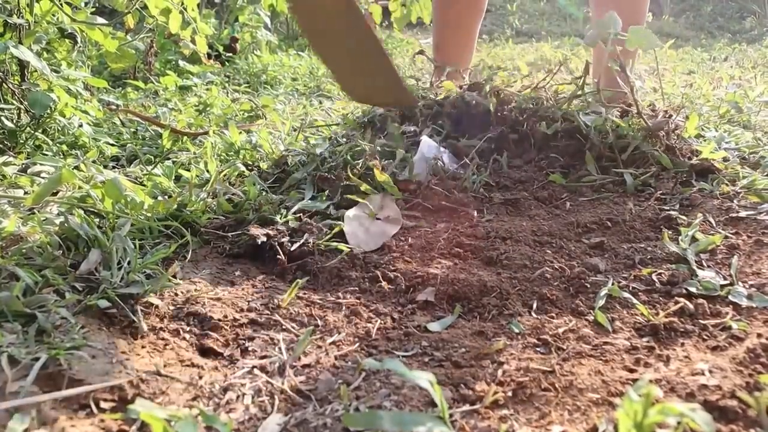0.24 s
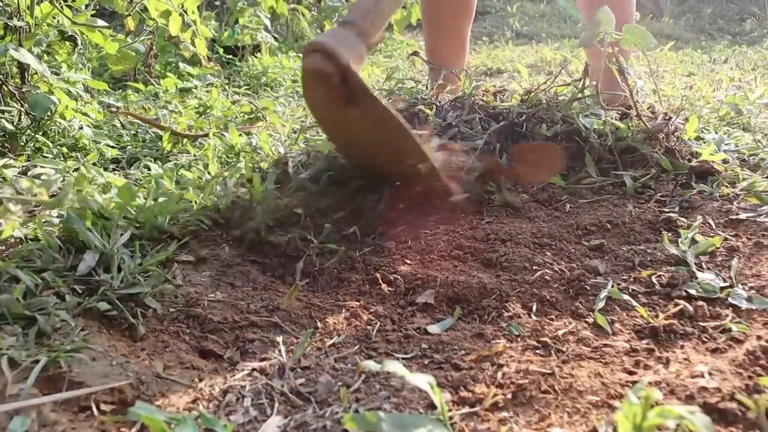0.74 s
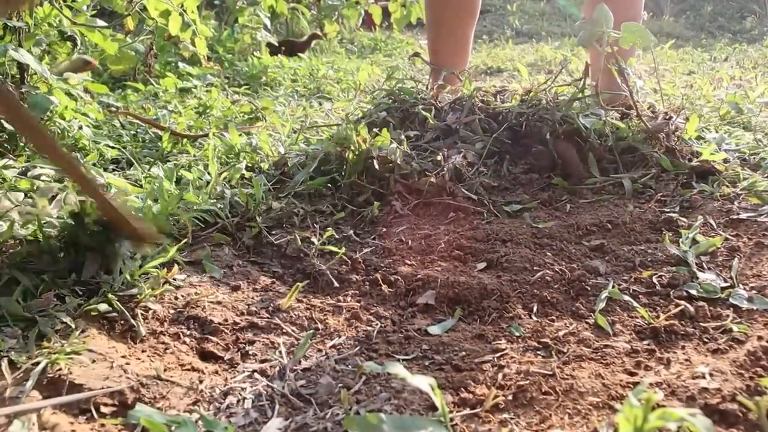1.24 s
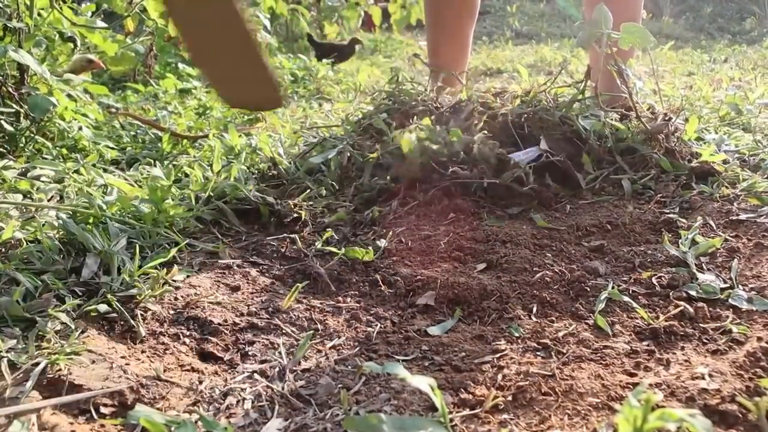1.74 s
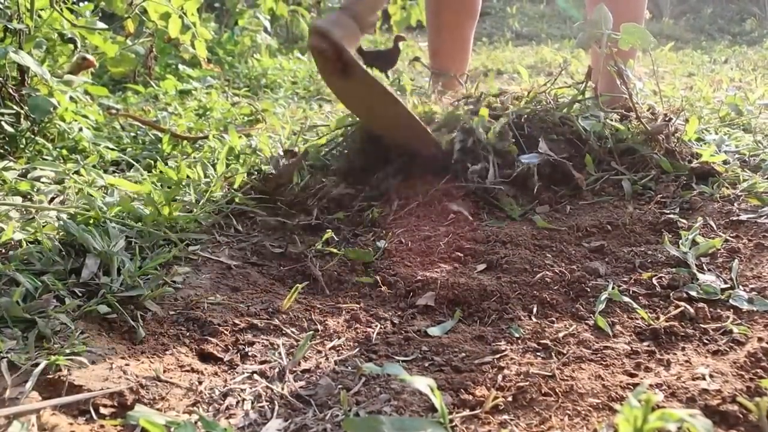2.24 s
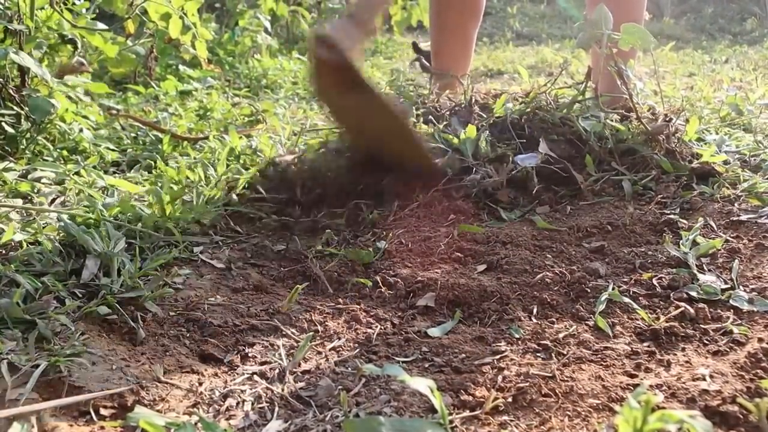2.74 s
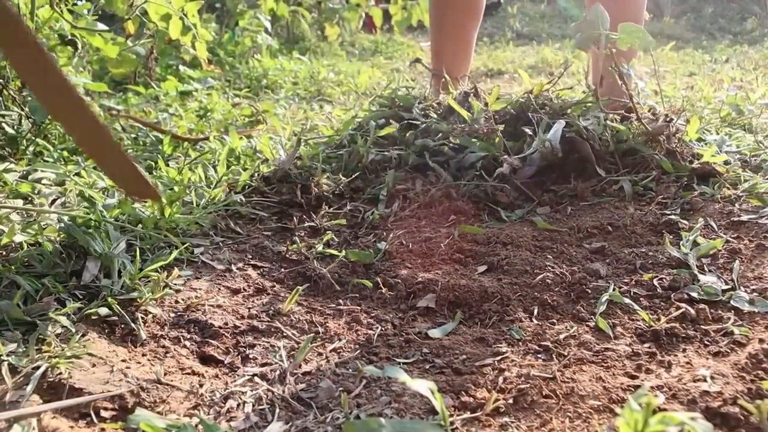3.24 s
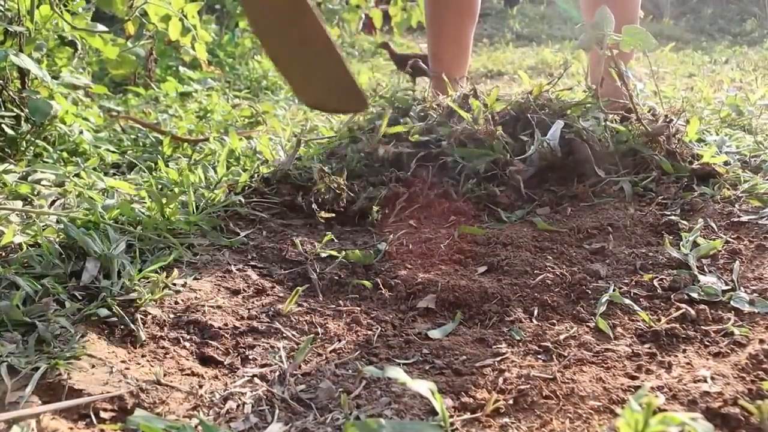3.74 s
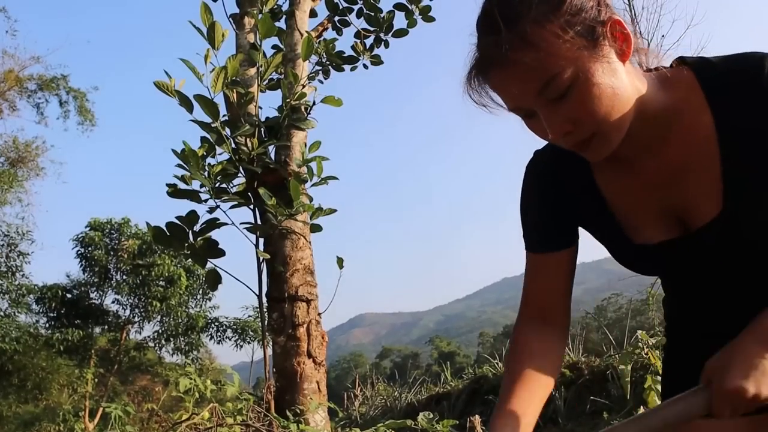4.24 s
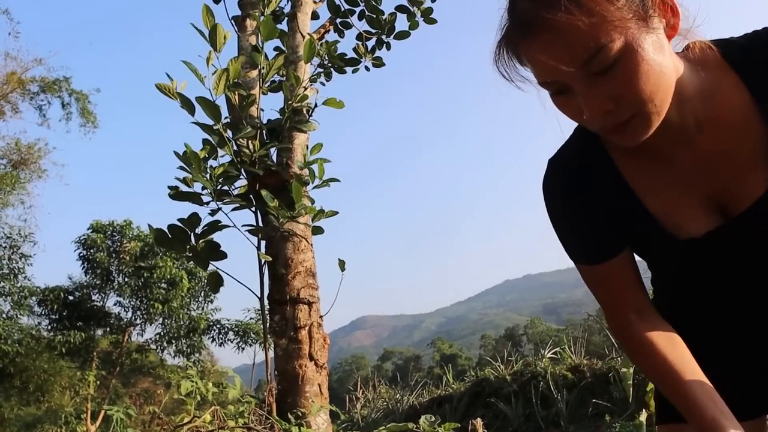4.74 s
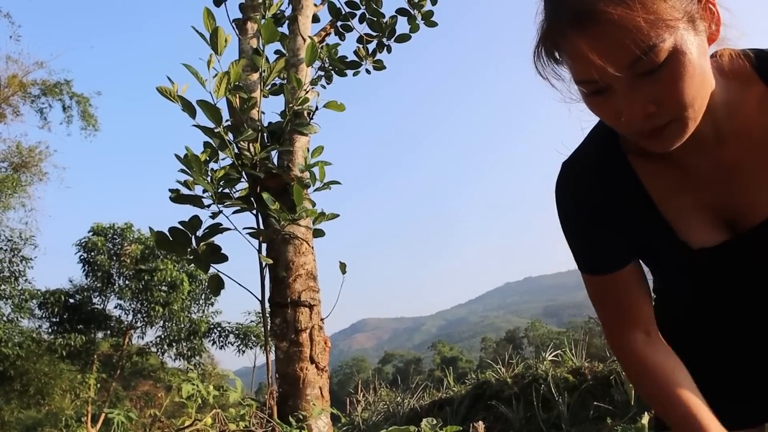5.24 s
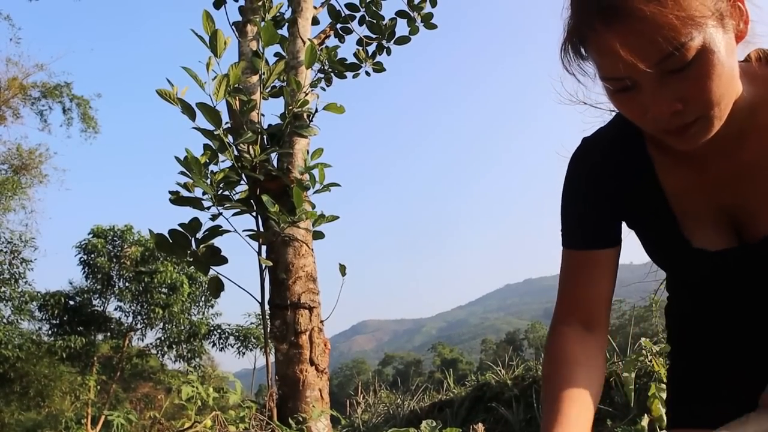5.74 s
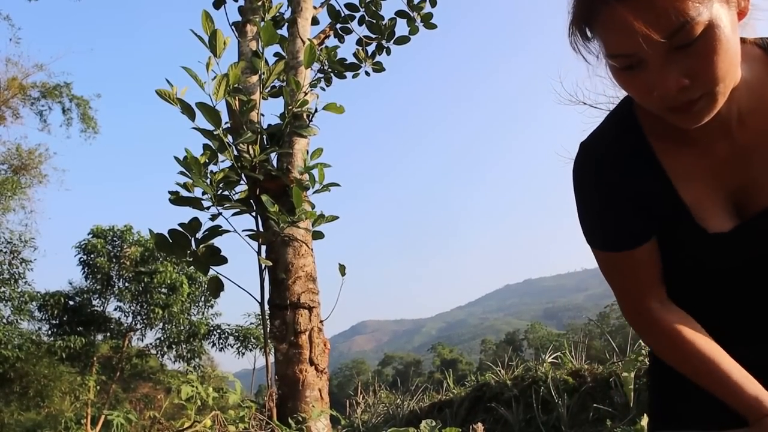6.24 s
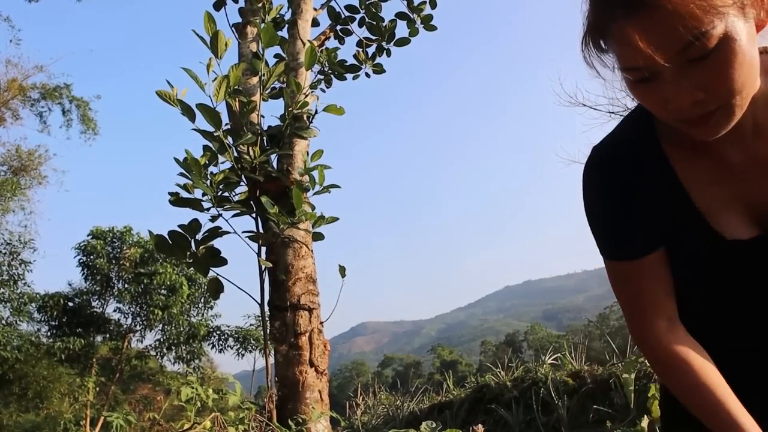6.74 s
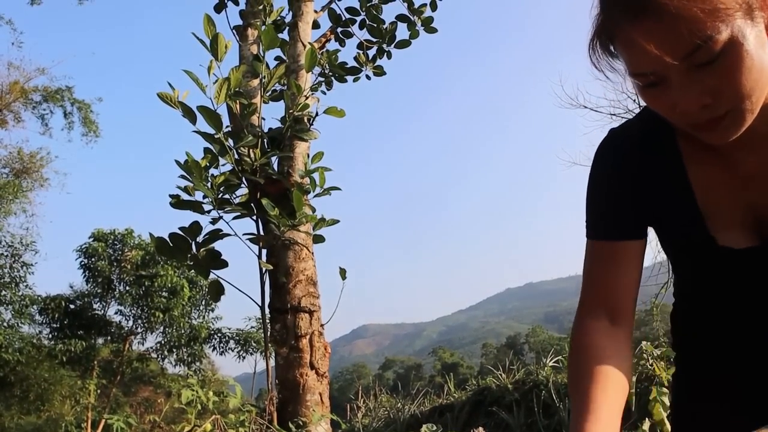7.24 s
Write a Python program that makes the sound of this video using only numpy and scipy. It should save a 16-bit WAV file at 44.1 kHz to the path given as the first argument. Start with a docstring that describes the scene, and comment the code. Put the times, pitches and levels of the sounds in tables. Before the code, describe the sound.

Ten hoe strokes in steady rhythm, miked close outdoors in stereo. First a soft gritty thud, then louder sharp chops with packed-earth knocks, scraping stones, brief metallic clinks and falling clods. Between them, high chick peeps glide downward and a low far engine hums. Around the middle the sound cuts for an instant; four more gritty chops follow from another position, with weed rustling, crumbs, two soft footstep-like thumps and faint insect hiss.

```python
"""First comes a soft, gritty thud: a steel hoe chops dry, grassy soil, ten strokes in all.
Strokes swish, bite and drag as bursts of random cracks coloured by the soil; clods knock and trickle.
Stones scrape the blade, so its resonances clink; chicks peep nearby as gliding near-sines.
Coloured noise makes the faint garden air, with a far engine at first and far insects later.
It is heard from the ground, then from a little aside, with a tiny silence in between."""
import sys
import numpy as np
from scipy import signal
from scipy.fft import rfft, irfft
from scipy.io import wavfile

SR = 44100
rng = np.random.default_rng(int(sys.argv[2]) if len(sys.argv) > 2 else 0)


def put_to_file(sound):
    """Save the sound as 16-bit audio at rate SR, in the file named by the first command-line argument."""
    columns = np.atleast_2d(sound).T  # one column per channel
    safe = np.clip(columns, -1, 1)
    whole_steps = np.round(safe * 32767)
    wavfile.write(sys.argv[1], SR, whole_steps.astype(np.int16))


N = 330750
TIME = np.arange(N) / SR
MOVE_S = 3.92  # the listening place changes here
FIRST_PLACE = TIME < MOVE_S

# strokes of the hoe: bite at t/s, crunch level/dB, bite rise/s, bite length/s, thud/dB re crunch,
#   grit/dB re crunch, time in the weeds before the bite/s, swish level/dB, delay of the drag/s,
#   drag level/dB, trickle level/dB before the lift of each kind of debris
STROKES = [(0.0, -36.5, 0.0015, 0.017, 5, 1, 0.0095, -38, 0.057, -39.5, -44.5),
           (0.707, -14.5, 0.0046, 0.013, -4.5, -2.5, 0.059, -27.5, 0.085, -31, -47.5),
           (1.4017, -8.5, 0.0017, 0.0043, -11.5, -7, 0.096, -28.5, 0.11, -37, -48),
           (2.0968, -13, 0.0021, 0.011, -4.5, -2, 0.065, -32, 0.081, -30.5, -48.5),
           (2.7827, -4.5, 0.001, 0.0027, -15, -6.5, 0.11, -37.5, 0.109, -42.5, -47),
           (3.464, -13, 0.00095, 0.019, -3, -3.5, 0.11, -37, 0.041, -25, -50),
           (4.56, -17, 0.0002, 0.0025, -2, 9.5, 0.0022, -34, .085, -40, -56),
           (5.293, -20, 0.0024, 0.028, -17, -4.5, 0.025, -24.5, 0.1, -35, -51.5),
           (6.0307, -13, 0.00031, 0.0043, -6.5, 2, 0.0069, -28.5, 0.087, -36, -52),
           (6.7844, -12.5, 0.00079, 0.0044, -11.5, 1, 0.0097, -26.5, 0.13, -40, -55)]
# clods breaking or landing, two footstep-like thumps (near 5.7 s), and a faint rustle as the sound
#   returns after the silence: t/s, crunch level/dB, length/s, thud/dB re crunch, grit/dB re crunch
CLODS_AND_THUMPS = [(0.022, -36.5, 0.019, -13, 0), (0.1036, -25, 0.0049, -3.5, -1.5),
                    (0.653, -31.5, 0.015, -22, -28), (0.722, -20, 0.0066, -2, 0.5),
                    (0.737, -26, 0.00202, -14.5, -2), (0.746, -25.5, 0.012, -10, -6),
                    (0.765, -25, 0.0066, -17, -4), (0.828, -24.5, 0.0096, -3.5, -4),
                    (0.844, -39, 0.016, -5, 0), (1.371, -37, 0.0063, -12, 7), (1.435, -30, 0.016, -8, -10),
                    (1.501, -30, 0.016, -8, -2.5), (1.898, -52, 0.0052, 5.5, 9),
                    (2.115, -25.5, 0.0064, 4.5, 1.5), (2.166, -24.5, 0.0043, 0.5, -13),
                    (2.18, -22, 0.0049, -8, -3), (2.219, -32.5, 0.0066, -8, -3),
                    (2.866, -37, 0.0037, -2, -8), (3.456, -26, 0.0049, -18, -12),
                    (3.559, -30.5, 0.03, -7.5, 0), (3.5847, -25, 0.0055, -5, -1),
                    (3.889, -53, 0.0008, -12, 15), (3.922, -46.5, 0.045, -4, -1.5),
                    (4.5697, -18.5, 0.0037, -5, 5), (4.574, -27, 0.0008, -1, 8),
                    (4.636, -47, 0.025, -12, -4), (4.645, -37.5, 0.0059, -15, 4.5),
                    (4.928, -42.5, 0.0091, -2, -7), (5.2705, -20, 0.0024, -21, 0),
                    (5.312, -25, 0.0048, -13, 6), (5.342, -28, 0.01, -18, -6),
                    (5.391, -15.5, 0.0059, -16.5, -9.5), (5.662, -43, 0.0092, 8.5, 5),
                    (5.78, -44.5, 0.0079, 9, -13), (6.035, -20, 0.0051, -7.5, 4),
                    (6.105, -38.5, 0.0044, -15.5, 8), (6.128, -29.5, 0.0065, -13, -9),
                    (6.776, -22, 0.0042, -11, -1), (6.921, -33, 0.0083, -10, -14)]
# stones scraping the blade: t/s, ring level/dB, scrape/s, factor on the blade's own ring times,
#   highest excited f/Hz, crunch level/dB, thud/dB re crunch
STONES = [(.217, -47, 0.0028, 4.5, 4770, -40, -14), (.258, -40.5, 0.012, 1.6, 3500, -43, -1),
          (0.7745, -22, 0.0015, 0.41, 4900, -18, 0), (.801, -33, .002, 0.66, 8000, -44, -18),
          (1.4519, -13, 0.0042, 0.79, 12000, -16, -8.5), (2.147, -36, .003, .7, 7000, -29, -8),
          (2.798, -13.5, 0.0046, 0.16, 7000, -32, -43), (2.831, -16.5, 0.0077, 0.38, 9000, -25, -36),
          (2.839, -13, 0.0029, 0.34, 5400, -36, -30), (3.0318, -29.5, 0.00056, 2.14, 4240, -34, -3),
          (3.492, -20.5, 0.0081, 0.61, 6860, -27, -12), (3.526, -15.5, 0.0027, 0.41, 3360, -29, 1.5),
          (4.561, -20.5, 0.0039, 0.76, 4500, -26, -18)]
# hollow knocks of the blade on packed earth: t/s, f/Hz, level/dB, decay/s
KNOCKS = [(0.708, 569, -9, 0.0071), (0.7745, 417, -12, 0.0045), (1.4017, 756, -2, 0.0019),
          (1.4545, 1110, -7, .003), (2.0965, 520, -5.5, 0.0027), (2.783, 980, -6, 0.0006),
          (3.467, 525, -9.5, 0.0049), (3.471, 790, -9, 0.0042), (5.295, 473, -13.5, 0.0044)]
# resonances of the blade: f/Hz, level/dB re the ring, basic time to fade by 60 dB/s
BLADE_MODES = [(550, -9, 0.13), (1407, -10, 0.11), (2043, -3, 0.03), (2973, -2, 0.13), (3110, -4.5, 0.07),
               (3510, -12.5, .045), (4110, -1.5, 0.08), (4370, -10, 0.079), (4530, -6, 0.044),
               (5370, 0.5, 0.11), (5530, -2, 0.081), (6800, -4, .06), (7060, -8, 0.055), (9990, -9, 0.07)]
# the blade rakes through loose weeds: t/s, length/s, level/dB before the lift of each kind of debris
RAKES = [(3.94, 0.34, -57.5), (5.447, 0.33, -57), (6.163, 0.24, -58)]
# colour of the soil at the first and at the second listening place: f/Hz, relative level/dB per Hz
SOIL_FIRST = [(21, -33), (35, -17.5), (135, -1), (338, -9.5), (563, -3.5), (760, -5), (961, -9), (1120, -5),
              (1270, -7.5), (2530, -9.5), (2730, -10), (3020, -10), (5570, -11), (7370, -13), (8590, -11.5),
              (15400, -33)]
SOIL_SECOND = [(21, -53), (35, -3), (188, 6), (298, -2), (447, 7), (1120, 5), (1440, 0.5), (1910, -1),
               (2280, -8), (2800, -6.5), (4320, -18.5), (6660, -13), (7960, -12.5), (11100, -32),
               (15400, -50)]
# peeps of the chicks: t/s, glide length/s, start f/Hz, end f/Hz,
#   sag of the glide (1 steep at first, -1 steep at last), drop at the voice break/octaves,
#   level/dB before the shared lift
PEEPS = [(0.361, 0.035, 4600, 3366, -0.3, 0.012, -41.5), (0.528, 0.044, 4670, 3000, 0.82, 0, -40),
         (0.582, 0.059, 3850, 2370, 0.14, 0, -39.5), (1.1, 0.082, 4020, 2660, -0.95, 0.05, -43),
         (1.208, 0.046, 4720, 2970, 0.77, 0, -38), (1.572, 0.071, 4060, 2720, 1, 0.056, -37.5),
         (1.743, 0.026, 3940, 3450, -0.47, 0, -45), (1.765, 0.061, 4780, 2580, 0.11, 0, -36),
         (2.311, 0.057, 3620, 2630, 0.25, 0.052, -37), (2.383, 0.058, 4100, 2100, -0.48, 0.18, -43.5),
         (2.457, 0.055, 4290, 2680, -0.27, 0, -38.5), (2.542, 0.072, 4090, 2210, -1.1, 0.24, -40.5),
         (2.66, 0.06, 5560, 2680, 0.98, 0.063, -38.5), (3.147, 0.036, 4400, 2700, 0.36, 0.2, -47),
         (3.274, 0.072, 5070, 2400, 0.6, 0.18, -40.5), (3.4, 0.055, 3310, 2880, -0.99, 0, -43.5),
         (3.627, 0.041, 3070, 2030, -0.59, 0, -37.5), (3.785, 0.068, 3920, 2200, -1.45, 0.27, -42),
         (3.856, 0.0056, 1910, 1450, -0.044, 0, -33.5), (3.898, 0.0072, 4750, 4120, -0.61, 0.017, -36.5),
         (4.165, .048, 3390, 2610, 0.53, 0.0072, -44), (4.331, 0.045, 4200, 2540, 0.49, 0, -47),
         (4.491, 0.058, 5640, 3150, 1, 0, -48.5), (5.088, 0.063, 4130, 2790, 0.82, 0.015, -48.5),
         (5.522, 0.035, 4070, 2960, 0.43, 0.027, -44.5), (6.65, 0.049, 3990, 2360, 0.74, 0.12, -40.5)]
# stereo picture: f/Hz, side level/dB re mid at the first place, the same at the second,
#   leftward lean (-1 to 1) at the first place, the same at the second
STEREO = [(60, -28, -26, 0.45, 0), (200, -16.5, -29, .7, .06), (400, -15, -26, 0.78, .2),
          (700, -5.5, -9.5, 1, 0.5), (1230, -5.5, -3, 0.48, 0.56), (2410, -5, 3.5, 0.44, -0.058),
          (4600, 3.5, 5, 0.71, -0.26), (8100, 0.5, 5.5, -0.1, -0.17), (15000, 6, 8, 0.45, -0.33)]
# a far engine that slows down: t/s, f/Hz before a slight waver, level/dB before a slight wander
ENGINE = [(0, 210.8, -57.5), (2.4, 207.2, -51), (3.3, 161.6, -61.5), (3.9, 144.4, -56)]
# colours of the far rumble and the crumbs: f/Hz, relative level/dB per Hz
RUMBLE_COLOUR = [(15, -29), (25, -10), (118, -5.5), (151, -0.5), (263, -8), (400, -5.5), (520, -33),
                 (880, -120)]
CRUMB_COLOUR = [(150, -46.5), (250, -4.5), (507, -3.5), (655, -4), (807, -7.5), (2540, -13), (3030, -9),
                (4000, -30), (5200, -38), (8800, -120)]
# colour of the grass at the first and at the second place: f/Hz, relative level/dB per Hz
GRASS_FIRST = [(1940, -24), (3300, 4), (3780, -1), (4240, 0.5), (8750, 1.5), (11800, -2.5), (15400, -19)]
GRASS_SECOND = [(1940, -28), (3300, 4), (5020, -0.5), (6930, 3.5), (7990, 2.5), (9640, -4.5), (12400, -17),
                (15400, -25)]
# width of the outdoor air: f/Hz, side level/dB re mid
AIR_WIDTH = [(60, -17), (130, -16.5), (290, -3.5), (640, 0), (1400, 0.5), (3100, 6), (6800, 7), (15000, 3)]

# a swish through the weeds swells up to the bite; thud and grit are relative to its crunch
SWISH_RISE_S, SWISH_STOP_S, SWISH_THUD_DB, SWISH_GRIT_DB = 0.026, 0.0048, -6.5, 3.5
# pulled back, the blade shoves a wave of loose earth
DRAG_RISE_S, DRAG_FALL_S, DRAG_THUD_DB, DRAG_GRIT_DB = 0.026, 0.03, -12, -1
CLOD_RISE_S = 0.00036
STONE_RISE_S, STONE_LENGTH_S, STONE_GRIT_DB = 0.0015, 0.0085, 1
# crumbs and dry grass then trickle to rest
TRICKLE_PEAK_S, TRICKLE_DB_PER_S, RAKE_FADE_S = 0.045, 49.5, 0.12
# the garden at rest; the crumbs wander around their level
STILL_CRUMBS_DB, STILL_GRASS_DB, RUMBLE_DB = -55, -59.5, -54
# a peep hooks up to its starting pitch, and swells as it passes the resonance of the beak
HOOK_S, HOOK_OCTAVES, BEAK_HZ, BEAK_WIDTH_OCTAVES = 0.011, 0.16, 2840, 0.72
# falling through this pitch a voice may break: thin above it, fuller and lower below it
BREAK_HZ, BREAK_WIDTH_OCTAVES, THIN_VOICE_DB = 3500, 0.03, -3
# peeps fed to the leaf echo at the first and the second place
FIRST_ECHO_DB, SECOND_ECHO_DB = -10, -7
# right port leads at the second place: share of phase in the difference; decay of the scatter
LEAD_SHARE, SCATTER_S = 0.59, 0.00078
CUTOFF_HZ = 15600


def contacts():
    """List every soil burst or thump: t/s, level/dB, lead/s, rise/s, length/s, thud/dB, grit/dB."""
    for s, db, rise, length, thud, grit, weeds_s, swish_db, drag_s, drag_db, _ in STROKES:
        yield s, swish_db, weeds_s, SWISH_RISE_S, SWISH_STOP_S, SWISH_THUD_DB, SWISH_GRIT_DB
        yield s, db, weeds_s, rise, length, thud, grit
        yield s + drag_s, drag_db, drag_s, DRAG_RISE_S, DRAG_FALL_S, DRAG_THUD_DB, DRAG_GRIT_DB
    for s, db, length, thud, grit in CLODS_AND_THUMPS:
        yield s, db, np.inf, CLOD_RISE_S, length, thud, grit
    for s, *_, db, thud in STONES:
        yield s, db, np.inf, STONE_RISE_S, STONE_LENGTH_S, thud, STONE_GRIT_DB


def grains(per_s, spread_db, size):
    """Breaking grains make random cracks of very uneven strength; their rms is 1."""
    strength = from_db(spread_db * np.minimum(rng.exponential(1, size), 4))
    sign = rng.choice([-1, 1], size)
    happens = rng.random(size) < per_s / SR
    cracks = strength * sign * happens
    return cracks / magnitude(cracks) * np.sqrt(size)


def hollow(share, decay_s, size=512):
    """Blade and furrow throw back early reflections that colour each contact differently."""
    echoes = rng.standard_normal(size) * np.exp(-np.arange(size) / (decay_s * SR))
    echoes[0] = 0
    return signal.unit_impulse(size) + share * echoes / magnitude(echoes)


def soil_blows(per_s, crumbs_per_s, spread_db, tail_db, tail_s, push_db, push_s, size=16384):
    """Each contact is a swell of breaking grains: the ground thuds, clods crunch, sand and stems hiss."""
    out = np.zeros(N)
    t = (np.arange(size) - size // 4) / SR
    after = np.maximum(t, 0)
    thud_crunch_grit_hz = [(25, 350), (350, 3500), (3500, 18000)]
    places = []
    for colour in (SOIL_FIRST, SOIL_SECOND):
        soil = response(colour)
        places.append([band(soil, low, high, order=3) for low, high in thud_crunch_grit_hz])
    # the ground is pressed down and springs back once
    push = (after / push_s) * (1 - after / push_s / 2) * np.exp(-after / push_s)
    for s, db, lead, rise, length, thud, grit in contacts():
        # pressure builds and the soil gives way in dense cracks; then sparse crumbs run on
        bite = np.exp(np.minimum(t, 0) / abs(rise) - (after / length) ** 2) * (t > -abs(lead))
        tail_height = from_db(tail_db) * np.sqrt(abs(length) / tail_s)
        tail = tail_height * np.exp(-after / tail_s) * (t > 0)
        cracks = bite * grains(per_s, spread_db, size) + tail * grains(crumbs_per_s, spread_db, size)
        cracks = signal.fftconvolve(cracks, hollow(share=0.45, decay_s=0.0011))
        target = magnitude(np.hypot(bite, tail))
        for body, rel_db in zip(places[int(s > MOVE_S)], (thud, 0, grit)):
            burst = signal.fftconvolve(cracks, body)[:size]
            add(out, s + t[0], from_db(db + rel_db) * burst * target / magnitude(burst))
        add(out, s, from_db(db + thud + push_db) * push[size // 4:])
    return out


def knocks(rise_s):
    """Packed earth answers the blade with a few quickly damped cycles."""
    out = np.zeros(N)
    t = np.arange(SR // 10) / SR
    for s, hz, db, decay in KNOCKS:
        envelope = (1 - np.exp(-t / rise_s)) * np.exp(-t / decay)
        add(out, s, from_db(db) * envelope * np.sin(2 * np.pi * hz * t))
    return out


def resonate(x, hz, t60):
    """One resonance stores motion and lets it die away; its gain is about 1 at its peak."""
    r = from_db(-60 / (t60 * SR))
    feed = np.array([1, 0, -1]) * (1 - r * r) / 2
    feedback = [1, -2 * r * np.cos(2 * np.pi * hz / SR), r * r]
    return signal.lfilter(feed, feedback, x + 1e-18)


def buried_blade(soil, ring_db, damping, dull_hz, grip_db):
    """Soil noise drives the damped blade, mostly its lowest mode; strong noise is limited, as if gripped."""
    grip = from_db(grip_db)
    drive = grip * np.tanh(soil / grip) * FIRST_PLACE
    out = np.zeros(N)
    for hz, db, t60 in BLADE_MODES:
        gain = from_db(ring_db + db) / np.hypot(1, (hz / dull_hz) ** 2)
        out += gain * resonate(drive, hz, t60 * damping)
    return out


def clinks(size=16384):
    """A stone scrapes the steel briefly; every mode gathers the scratches and rings on."""
    out = np.zeros(N)
    t = np.arange(size) / SR
    for s, db, scrape, free, top_hz, *_ in STONES:
        rub = np.exp(-(t / scrape) ** 2) + 1e-12
        for hz, mode_db, t60 in BLADE_MODES:
            ring_s = abs(t60 * free)
            ring = resonate(rub * rng.standard_normal(size), hz, ring_s)
            height = from_db(db + mode_db) / np.hypot(1, (hz / top_hz) ** 10)
            # scaled like a sine of this height that dies away
            target = np.sqrt(ring_s * SR / np.log(1e12))
            add(out, s, height * ring / magnitude(ring) * target)
    return out


def chicks(level_db, octave_db, waver, flutter_db, hook_db):
    """A peep is a near sine with a weak octave: it hooks up, then glides down, loudest near the beak's pitch."""
    out = np.zeros(N)
    for s, length, start_hz, end_hz, sag, drop, db in PEEPS:
        t = np.arange(-HOOK_S, length, 1 / SR)
        slide = np.maximum(t, 0) / length
        hook = np.minimum(t, 0) / HOOK_S
        # the glide sags or arches; the drop comes in where the voice breaks
        bent = slide + sag * slide * (1 - slide)
        glide = start_hz * (end_hz * 2 ** drop / start_hz) ** bent
        broken = (1 + np.tanh(np.log2(BREAK_HZ / glide) / BREAK_WIDTH_OCTAVES)) / 2
        hz = glide * 2 ** (-drop * broken - HOOK_OCTAVES * hook ** 2)
        thin_db = THIN_VOICE_DB * (1 - broken) * min(10 * abs(drop), 1)
        unsteady, flutter = signal.resample(rng.standard_normal(size=(2, 16)), len(t), axis=1)
        phase = 2 * np.pi * np.cumsum(hz * (1 + waver * unsteady)) / SR
        swell = (1 - hook ** 2) * np.sqrt(1 - slide ** 10) * from_db(hook_db * (1 - slide) ** 2)
        beak = 1 / np.hypot(1, np.log2(hz / BEAK_HZ) / BEAK_WIDTH_OCTAVES)
        tone = np.sin(phase) + from_db(octave_db) * beak ** 10 * np.sin(2 * phase)
        gain = from_db(db + level_db + thin_db + flutter_db * flutter)
        add(out, s - HOOK_S, gain * swell * beak * tone)
    return out


def two_ports(mid, wander, size=512):
    """Two close ports differ in level and phase, mostly more with pitch, blurred by scatter from near clods."""
    wide_a, wide_b, *leans = at_hz(STEREO, np.fft.rfftfreq(N, 1 / SR))
    lean_a, lean_b = np.clip(leans, -1, 1)
    lead = np.clip(LEAD_SHARE, 0, 1)
    bursts = rng.standard_normal((2, size)) * np.exp(-TIME[:size] / SCATTER_S)
    scatter_a, scatter_b = np.exp(1j * np.angle(rfft(bursts, N)))
    view_a = lean_a + np.sqrt(1 - lean_a ** 2) * scatter_a
    # the -1j makes the left lag and the right lead
    blur_b = np.sqrt(1 - lead ** 2) * scatter_b - 1j * lead
    view_b = lean_b + np.sqrt(1 - lean_b ** 2) * blur_b
    views = [from_db(wide_a) * view_a, from_db(wide_b) * view_b]
    # keeping only positive frequencies lets the phase be turned over time
    first, second = 2 * np.fft.ifft(rfft(mid) * views, N)
    # flying earth never comes from quite the same direction
    turn = np.exp(1j * wander * drift(49))
    side = np.real(np.where(FIRST_PLACE, first, second) * turn)
    return np.array([mid + side, mid - side])


def garden_echo(x, t60, gap_s=0.0051, size=16384):
    """Ground and leaves scatter a faint tail, different in each ear."""
    t = np.arange(size) / SR
    noise = band(rng.standard_normal((2, size)), 300, 9000)
    tails = noise * from_db(-60 * t / t60) * (t > gap_s)
    return np.array([signal.fftconvolve(x, tail / magnitude(tail))[:N] for tail in tails])


def engine(lower_db, waver):
    """The third and second orders of a far engine hum faintly at the first place."""
    hz, db = in_time(ENGINE)
    phase = 2 * np.pi * np.cumsum(hz * (1 + waver * drift(10.7))) / SR
    hum = np.sin(phase) + from_db(lower_db) * np.sin(phase * 2 / 3)
    return from_db(db + 1.0 * drift(9.0)) * FIRST_PLACE * hum


def insects(hz, t60, db):
    """Far insects merge into one thin, high band of noise at the second place."""
    chorus = resonate(resonate(rng.standard_normal(N), hz, t60), hz, t60)
    return from_db(db) * ~FIRST_PLACE * chorus / magnitude(chorus) * np.sqrt(N)


def stirring():
    """Loose debris swells after each stroke and dies away, and holds while the blade rakes."""
    power = np.zeros(N)
    for s, *_, db in STROKES:
        age = np.maximum(TIME - s, 0)
        rise = np.minimum(age / TRICKLE_PEAK_S, 1)
        fall_db = TRICKLE_DB_PER_S * np.maximum(age - TRICKLE_PEAK_S, 0)
        power += (rise * from_db(db - fall_db)) ** 2
    for s, length, db in RAKES:
        inside_s = np.minimum(TIME - s, s + length - TIME)
        power += (from_db(db) * np.clip(1 + inside_s / RAKE_FADE_S, 0, 1)) ** 2
    return np.sqrt(power)


def background(crumbs_db, grass_db, tick_share):
    """Noise and random ticks, each coloured, form far rumble, trickling crumbs and dry grass all around."""
    stirred = stirring()
    # earth trickles in uneven little runs
    runs = from_db(1.0 * drift(45))
    crumbs = np.hypot(from_db(STILL_CRUMBS_DB), from_db(crumbs_db) * stirred) * runs
    grass = np.hypot(from_db(STILL_GRASS_DB), from_db(grass_db) * stirred)
    # colour, lowest Hz, highest Hz, gain
    layers = [(RUMBLE_COLOUR, 20, 300, from_db(RUMBLE_DB)),
              (CRUMB_COLOUR, 300, 3500, crumbs),
              (GRASS_FIRST, 3500, 18000, grass * FIRST_PLACE),
              (GRASS_SECOND, 3500, 18000, grass * ~FIRST_PLACE)]
    out = np.zeros((2, N))
    for colour, low, high, gain in layers:
        source = rng.standard_normal((2, N)) + tick_share * grains(1100, 7.7, size=N)
        body = band(response(colour), low, high, order=3)
        out += signal.oaconvolve(source, body[None] / magnitude(body))[:, :N] * gain
    width_db, = at_hz(AIR_WIDTH, np.fft.rfftfreq(N, 1 / SR))
    mid = out[0]
    side = irfft(rfft(out[1]) * from_db(width_db), N)
    return np.array([mid + side, mid - side])


def from_db(db):
    """Turn decibels into a gain."""
    return 10 ** (np.asarray(db) / 20)


def magnitude(x):
    """Root of the summed squares."""
    return np.sqrt(np.sum(x ** 2) + 1e-20)


def drift(per_s):
    """A smooth random wander with a spread of about 1."""
    return signal.resample(rng.standard_normal(int(abs(per_s) * N / SR) + 2), N)


def in_time(rows):
    """Read each column of a curve at every sample."""
    s, *columns = np.transpose(rows)
    return [np.interp(TIME, s, c) for c in columns]


def at_hz(rows, hz):
    """Read each column of a spectrum at the given frequencies."""
    points, *columns = np.transpose(rows)
    return [np.interp(np.log(hz + 1), np.log(points), c) for c in columns]


def add(out, s, sound):
    """Mix a sound in from a given time."""
    at = round(s * SR)
    part = sound[max(-at, 0):N - at]
    out[max(at, 0):max(at, 0) + len(part)] += part


def band(x, low_hz, high_hz, order=2):
    """Keep one range of frequencies, without looking ahead in time."""
    return signal.sosfilt(signal.butter(order, [low_hz, high_hz], "band", fs=SR, output="sos"), x)


def response(spectrum, size=4096):
    """The most prompt (minimum-phase) click with this colour."""
    level_db, = at_hz(spectrum, np.fft.rfftfreq(size, 1 / SR))
    cepstrum = irfft(np.log(from_db(level_db)))
    cepstrum[1:size // 2] *= 2
    return irfft(np.exp(rfft(cepstrum[:size // 2], size)))


def scene():
    """The hoe close by, the chicks further off, the garden around them."""
    soil = soil_blows(per_s=4500, crumbs_per_s=1700, spread_db=3.5, tail_db=-8.5, tail_s=0.03,
                      push_db=-27, push_s=0.0015)
    ring = buried_blade(soil, ring_db=16, damping=.5, dull_hz=850, grip_db=-22)
    hoe = soil + knocks(rise_s=0.00018) + ring + clinks()
    peeps = chicks(level_db=1, octave_db=-14, waver=0.011, flutter_db=2.5, hook_db=-4.0)
    through_leaves = peeps * from_db(np.where(FIRST_PLACE, FIRST_ECHO_DB, SECOND_ECHO_DB))
    echoes = from_db(-17.5) * garden_echo(hoe, t60=0.047) + garden_echo(through_leaves, t60=0.12)
    far_insects = insects(hz=8580, t60=0.0057, db=-65.5)
    direct = two_ports(hoe + peeps + far_insects, wander=0.25)
    air = background(crumbs_db=4.5, grass_db=5.5, tick_share=0.46)
    return direct + echoes + engine(lower_db=-0.5, waver=0.0049) + air


def record(dry):
    """The sound drops out for about 10 ms between the places; peaks overload; the top is cut."""
    from_gap_s = np.abs(TIME - (MOVE_S - .005))
    live = np.clip(from_gap_s / .001 - 4.5, 0, 1)
    overloaded = np.clip(dry * live, -1, 1)
    # 60 dB down from 700 Hz above the cutoff
    top_cut = signal.cheby2(16, 60, CUTOFF_HZ + 700, fs=SR, output="sos")
    return signal.sosfilt(top_cut, overloaded)


dry = scene()
out = record(dry)
put_to_file(out)
```